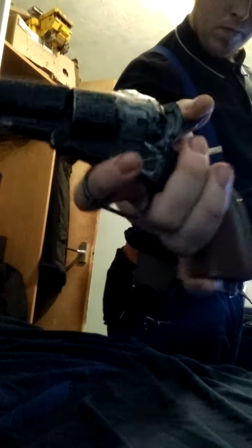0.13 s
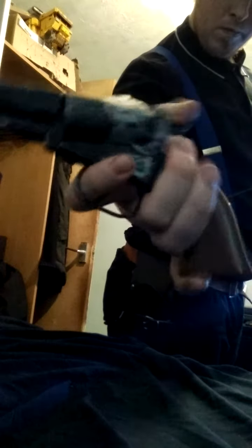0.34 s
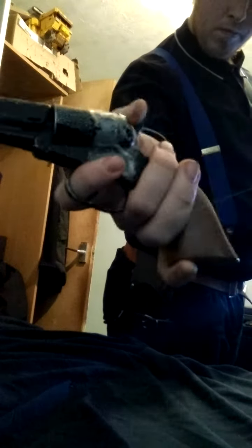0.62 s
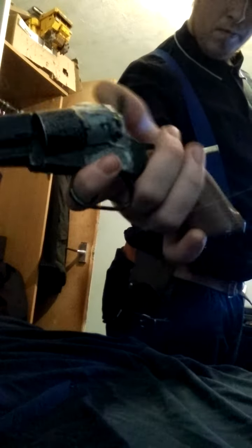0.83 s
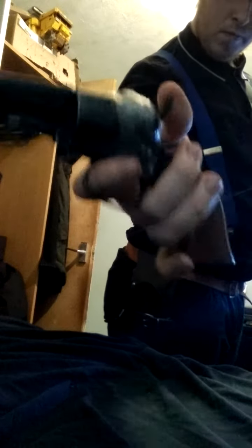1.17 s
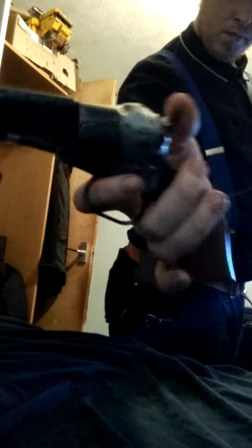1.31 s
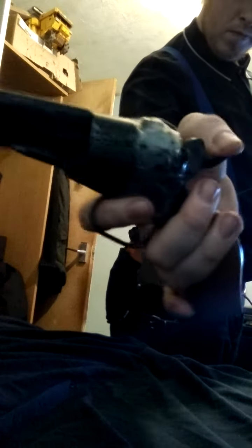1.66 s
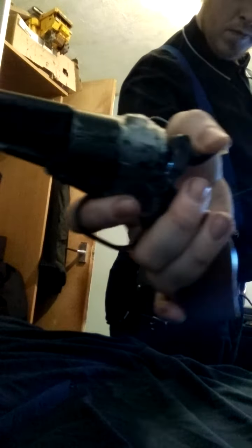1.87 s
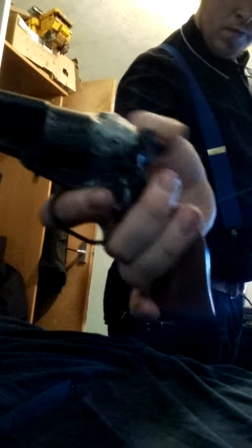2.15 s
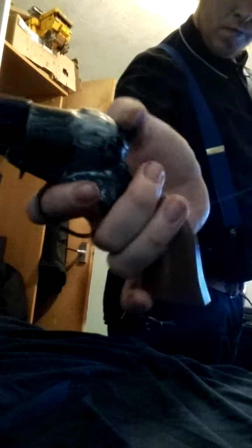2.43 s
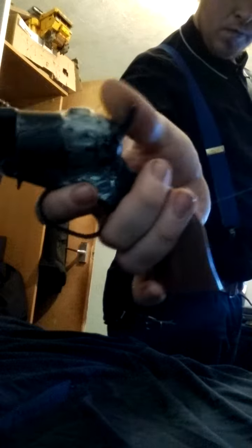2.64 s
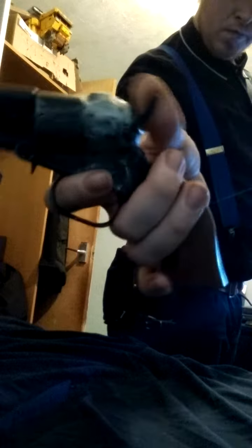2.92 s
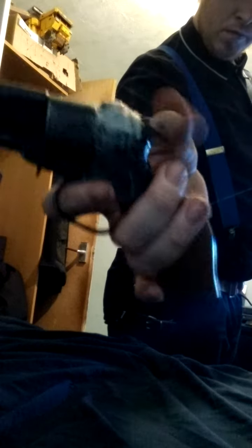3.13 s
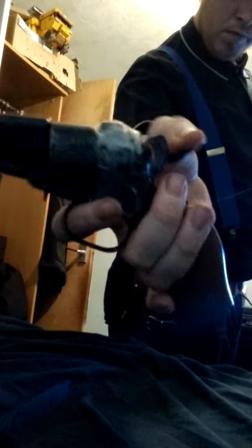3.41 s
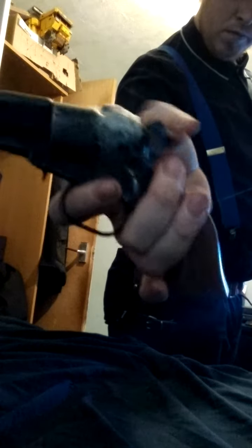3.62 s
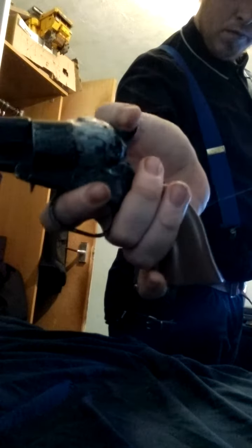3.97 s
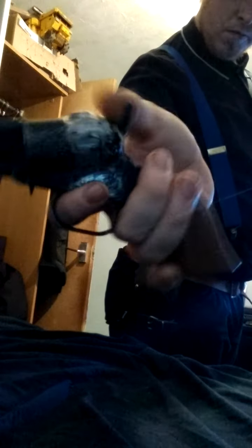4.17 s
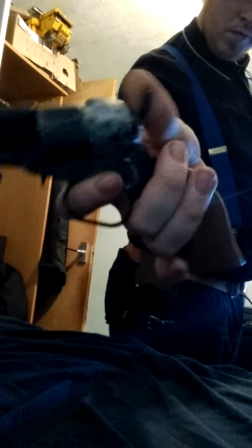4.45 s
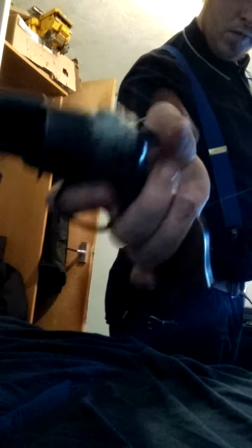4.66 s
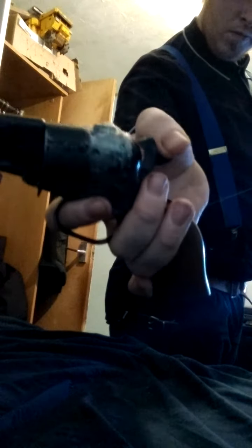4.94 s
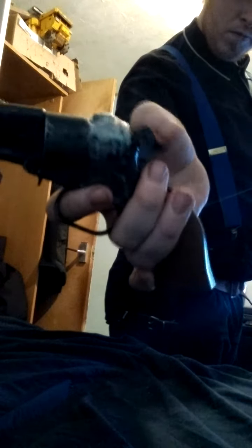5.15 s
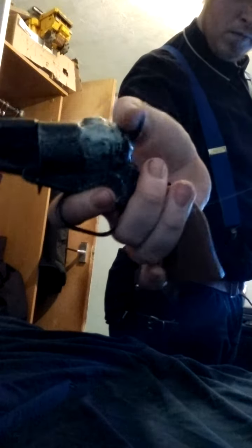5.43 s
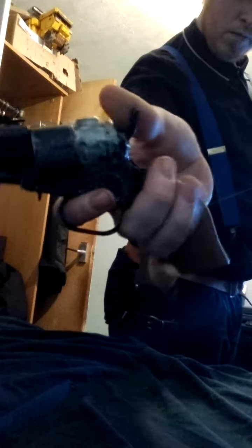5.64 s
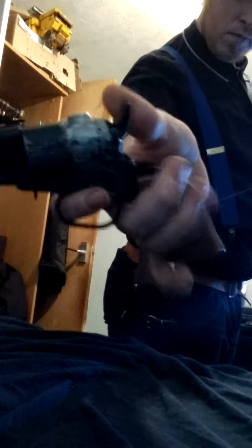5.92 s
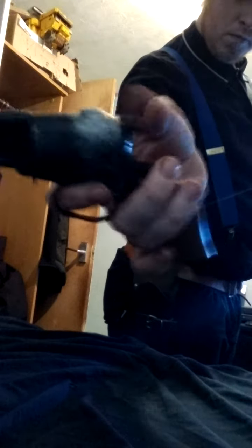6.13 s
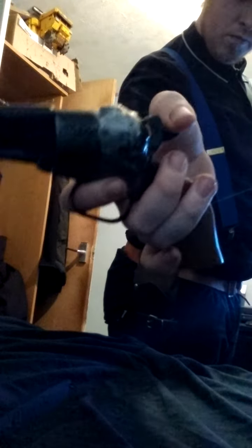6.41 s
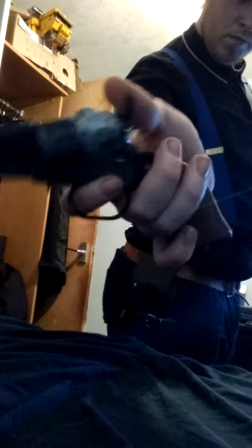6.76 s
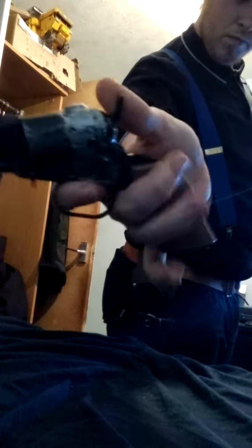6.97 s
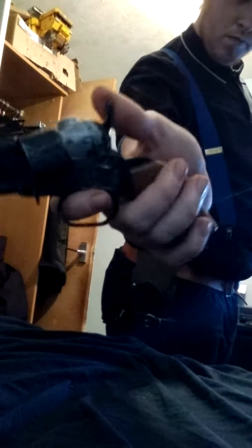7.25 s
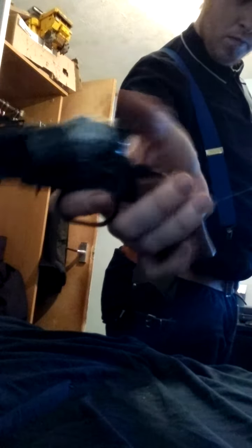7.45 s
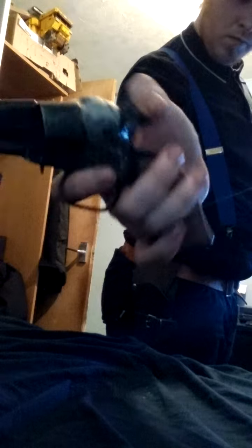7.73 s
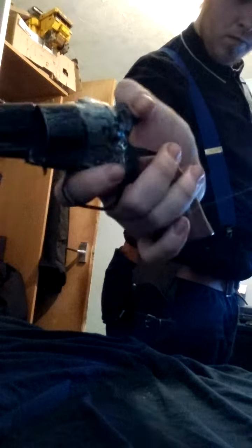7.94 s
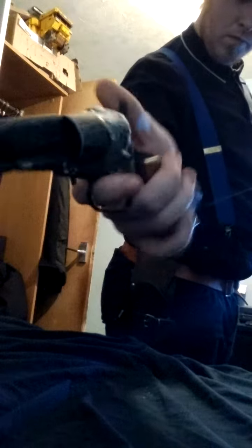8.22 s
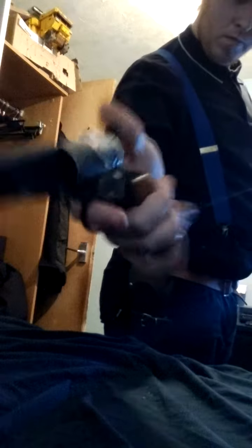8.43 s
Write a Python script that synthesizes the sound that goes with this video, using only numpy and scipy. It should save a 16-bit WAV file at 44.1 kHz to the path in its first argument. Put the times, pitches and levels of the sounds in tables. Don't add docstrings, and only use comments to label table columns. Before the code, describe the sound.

A die-cast toy gun is repeatedly cocked, dry-fired and eased down. Isolated sharp snaps come first, then clusters of ratcheting clicks and brief metal scrapes, ending with a fast run of loud snaps and a few weak ticks. The sound is dry, close and wide in stereo; the soft room noise dips after loud clicks and creeps back, with a low drone swelling faintly behind.

```python
import sys
import numpy as np
from scipy import signal
from scipy.fft import rfft, irfft
from scipy.io import wavfile
from scipy.ndimage import uniform_filter1d

SR = 44100
rng = np.random.default_rng(int(sys.argv[2]) if len(sys.argv) > 2 else 0)


def store_pcm(level_fs):
    pcm = np.round(np.clip(level_fs, -1, 1) * 32767).astype(np.int16)
    wavfile.write(sys.argv[1], SR, np.atleast_2d(pcm).T)


def magnitude_from_level(level_db):
    exponent = np.asarray(level_db, float) / 20
    return 10 ** exponent


N = 378378

# (f/Hz, level/dB, t60/s)
SPRING_PARTS = (10700, 15700), [(11320, 2.5, 0.0034), (12800, -3, 0.00063), (13400, -3.5, 0.0059),
                (14900, 0, .002)]
HAMMER_PARTS = (5620, 9600), [(7260, -6.5, 0.0047), (7580, -7.5, 0.0051), (8590, 2.5, 0.0034),
                (9430, 4, 0.0063), (9880, -1, 0.0068)]
FRAME_PARTS = (2090, 5190), [(3240, -2, .006), (3595, 10, 0.0089), (4350, 16, 0.0014), (4700, -9.5, 0.006),
               (4790, 13.5, 0.01)]
GRIP_PARTS = (490, 4300), [(626, -6, 0.023), (1280, 2, 0.011), (1573, 12.5, 0.01), (1730, -12.5, 0.083),
              (1990, 0, 0.014)]


def at_hz(points, hz, column=1):
    p = np.array(points)
    return np.interp(np.log(np.maximum(hz, 1)), np.log(p[:, 0]), p[:, column])


def rms_one(x):
    return x / np.sqrt(np.mean(x ** 2) + 1e-20)


def ring(x, hz, t60):
    decay = magnitude_from_level(-60 / (max(t60, .001) * SR))
    w = 2 * np.pi * hz / SR
    return signal.lfilter([0, np.sin(w)], [1, -2 * decay * np.cos(w), decay * decay], x)


def band_pass(x, band):
    return signal.sosfilt(signal.butter(2, band, "band", fs=SR, output="sos"), x)


def coloured(x, points):
    return irfft(rfft(x) * magnitude_from_level(at_hz(points, np.fft.rfftfreq(N, 1 / SR))), N)


def gain_db():
    # t/s, depth/dB
    ducks = [(.555, 10), (.79, 8.5), (2.17, 5.5), (2.597, 9.5), (3.232, 9.5), (3.952, 12.5), (4.75, 7),
             (5.328, 9.5), (6.68, 4.5), (6.793, 11), (8.097, 14)]
    recovery_db, recovery_curve = 7, 1.1
    overshoot_db, overshoot_s = 2.5, .06
    t, depth = np.arange(N) / SR, np.zeros(N)
    for s, db in ducks:
        since = np.clip(t - s, 0, None)
        dip = db - recovery_db * since ** recovery_curve
        dip += overshoot_db * np.exp(-since / overshoot_s)
        depth = np.maximum(depth, dip * (t >= s))
    return -uniform_filter1d(depth, size=300)


def background():
    # f/Hz, level/dB per Hz
    room_noise = [(20, 16), (35, 12), (50, 12), (110, 3), (300, 3.5), (700, -6), (1300, -12.5), (2500, -12),
                  (5000, -13), (9000, -13.5), (13000, -14), (15300, -17.5), (15750, -51.5)]
    # f/Hz, width/Hz, near port level/dB, far port level/dB
    hums = [(317.3, 6, -6, -6.5), (1237, 12, -22.5, -25), (7740, 250, -15, -60.5), (11100, 200, -23, -61),
            (15050, 250, -8.5, -63)]
    # t/s, level/dB, half-length/s
    swells = [(0.285, -57, 0.35), (1.196, -63, 0.21), (1.495, -61, 0.072), (1.97, -59, .08),
              (2.528, -60.5, .08), (3.054, -59, 0.051), (3.618, -59.5, .12), (4.582, -61.5, 0.092),
              (5.12, -57.5, 0.15), (5.666, -62, .05), (5.95, -58, .13), (6.44, -56.5, .07),
              (6.645, -57.5, 0.087), (7.05, -57.5, 0.089), (7.398, -56.5, 0.12), (7.807, -55, 0.19),
              (8.377, -63, .1)]
    room_db, drone_db = -63.5, -79
    white = rng.standard_normal((3, 2, N))
    noise = rms_one(coloured(white[0], room_noise)) * magnitude_from_level(8.5)
    for hz, width_hz, near_db, far_db in hums:
        t60 = np.log(1000) / np.pi / width_hz
        hum = ring(ring(white[1], hz, t60), hz, t60)
        noise += magnitude_from_level([[far_db], [near_db]]) * rms_one(hum)
    wander_hz = 3.4 * rms_one(uniform_filter1d(white[2, 0], size=6000))
    drone = np.sin(2 * np.pi * np.cumsum(59 + wander_hz) / SR)
    drone = drone * magnitude_from_level([[-3.0], [3.0]])
    t = np.arange(N) / SR
    swell = magnitude_from_level(drone_db) + sum(magnitude_from_level(db) * np.exp(-((t - s) / half) ** 2) for s, db, half in swells)
    return (noise * magnitude_from_level(room_db) + drone * swell) * magnitude_from_level(gain_db())


def room(x):
    # delay t/s, level/dB
    echoes = [(.0073, -8.5), (0.011, -22.5), (0.0186, -21.5)]
    # f/Hz, level/dB, t60/s
    decay = [(300, -9, 0.29), (1000, -3, 0.18), (1650, -6, 0.26), (2590, -12, 0.11), (5160, -1.5, 0.16),
             (8000, 1, 0.13), (11900, -3, 0.15), (15000, -18, .1)]
    t = np.arange(SR // 2) / SR
    edges = 200 * 2 ** np.arange(0, 6.6, .5)
    white, tail = rng.standard_normal((2, len(t))), 0
    for low, high in zip(edges, edges[1:]):
        hz = np.sqrt(low * high)
        t60 = np.clip(at_hz(decay, hz, column=2), .03, 1)
        tail = tail + band_pass(white, [low, high]) * magnitude_from_level(at_hz(decay, hz) - 60 * t / t60)
    tail = magnitude_from_level(-29) * tail * (1 - np.exp(-(t / 0.0013) ** 2))
    for delay, db in echoes:
        late = np.clip(t - delay, 0, None)
        tail += magnitude_from_level(db - 16.0) * white * (t >= delay) * np.exp(-late / 0.00052)
    return signal.fftconvolve(tail, x[None], axes=1)[:, :N]


def slide_db(start, end, first_db, last_db):
    curve, on_db_per_s, off_db_per_s = 2.5, 2502, 1200
    t = np.arange(N) / SR
    travel = np.clip((t - start) / max(end - start, .001), 0, 1)
    edges = on_db_per_s * np.clip(start - t, 0, 1) + off_db_per_s * np.clip(t - end, 0, 1)
    return first_db + (last_db - first_db) * travel ** curve - edges


def scrape():
    # start t/s, end t/s, first level/dB, last level/dB
    slides = [(0.513, 0.567, -59.5, -37.5), (1.587, 1.622, -29, -32.5), (2.346, 2.373, -60, -52),
              (3.173, 3.234, -46, -27.5), (4.743, 4.772, -44, -28), (5.256, 5.331, -57.5, -36.5),
              (6.146, 6.149, -26.5, -38.5), (6.155, 6.208, -54.5, -34.5), (6.721, 6.74, -55, -43.5),
              (6.785, 6.793, -59.5, -22.5), (7.504, 7.574, -46.5, -33.5), (8.074, 8.088, -53, -33),
              (8.112, 8.135, -58.5, -29.5), (8.327, 8.394, -65.5, -56)]
    # f/Hz, level/dB per Hz
    spectrum = [(180, -45), (300, -9), (1420, -12.5), (1700, -4.5), (2400, -6), (3270, -2.5), (4770, -7),
                (10300, -6), (15000, -28)]
    grains_per_s = 3500
    grains = (rng.random(N) < grains_per_s / SR) * magnitude_from_level(1.0 * rng.exponential(1, N))
    grains = grains * rng.choice([-1, 1], N)
    level = sum(magnitude_from_level(slide_db(*row) - 9.0) for row in slides)
    return level * rms_one(coloured(grains, spectrum))


def contact_rows():
    # t/s, spring
    # level/dB, hammer level/dB, frame level/dB, grip level/dB
    snaps = [(.0757, -27.5, -30, -41.5, -67), (0.5527, -12, -9.5, -19.5, -37.5),
             (2.5957, -10, -8, -17, -21.5), (3.2298, -13.5, -15.5, -12.5, -28.5),
             (3.3167, -39.5, -29, -43, -52.5), (3.9473, -9.5, -9, -13, -26.5),
             (5.3273, -9, -11, -15.5, -30.5), (6.6782, -13, -11.5, -14.5, -33.5),
             (6.7419, -24.5, -11.5, -10, -40.5), (6.7908, -10.5, -10, -19.5, -23.5),
             (8.0952, -14.5, -4.5, -10, -21), (8.1308, -16.5, -8, -24.5, -28),
             (.551, -31.5, -15, -26.5, -29.5), (1.622, -28, -27, -46, -55), (1.6259, -34, -34.5, -36, -55),
             (6.195, -31.5, -23.5, -21, -50), (8.0916, -24, -18, -36.5, -53)]
    # t/s, spring level/dB, hammer level/dB, frame level/dB, grip level/dB
    landings = [(.791, -24.5, -14.5, -18, -29), (1.5848, -31.5, -26, -20.5, -27.5),
                (2.1709, -14, -17, -14, -33), (2.3783, -26, -19, -21.5, -30.5),
                (4.2134, -28.5, -18.5, -25, -31), (5.5394, -28, -20.5, -27.5, -33),
                (7.317, -38, -37, -45.5, -73.5)]
    # t/s, hammer level/dB, frame level/dB, grip level/dB
    ratchet = [(1.5436, -38.5, -28, -33.5), (1.5923, -26.5, -26.5, -33), (1.5981, -28, -22, -30.5),
               (1.609, -25.5, -15.5, -25), (.771, -39, -52, -47.5), (3.737, -64, -59, -49),
               (5.978, -62, -51.5, -51), (3.173, -46, -33, -38), (3.176, -34, -31.5, -36.5),
               (3.1807, -31, -35, -44), (3.2046, -31, -30, -37), (3.2169, -38, -31, -43.5),
               (4.7444, -35.5, -30, -38), (4.762, -27.5, -41, -36), (4.765, -33, -27.5, -34),
               (4.7746, -27, -23, -29), (4.7959, -33.5, -34.5, -58), (6.1383, -41.5, -36.5, -30),
               (6.142, -28.5, -28.5, -43), (6.1795, -33.5, -23.5, -35), (6.191, -27, -39, -49),
               (6.1976, -25, -29, -36), (6.2082, -38, -35, -31), (6.2152, -24, -22, -25),
               (7.5025, -34.5, -31.5, -41), (7.5172, -29, -27, -39.5), (7.5442, -33, -30, -40),
               (7.5555, -34, -30.5, -40), (7.567, -43.5, -51, -34), (7.5731, -27.5, -24.5, -33)]
    # t/s, hammer level/dB, frame level/dB, grip level/dB
    take_up = [(.427, -39, -29.5, -40.5), (0.4442, -61.5, -42.5, -47), (.5089, -34.5, -42, -44.5),
               (0.5273, -47.5, -43.5, -38.5), (0.547, -29, -38, -42), (.754, -39, -54, -68),
               (1.546, -42, -43, -45), (1.5579, -44, -45, -49), (2.168, -46.5, -36, -44),
               (2.3659, -47.5, -44.5, -50), (2.5928, -36.5, -38, -45), (3.9405, -41.5, -50, -46.5),
               (4.699, -47.5, -39, -50.5), (4.7567, -34, -38, -46), (5.252, -53.5, -42, -42.5),
               (5.2642, -50, -40, -62), (5.3033, -43.5, -45, -42.5), (5.321, -49, -41, -51),
               (6.7266, -44, -45.5, -38), (6.7357, -44, -50.5, -48), (7.4947, -41, -47, -73),
               (7.498, -50, -31.5, -62), (7.5403, -42, -33, -44), (8.0556, -38, -37.5, -59.5),
               (8.0739, -39, -38, -36.5)]
    # t/s, hammer level/dB, frame level/dB
    ticks = [(1.5629, -43, -47), (2.392, -34, -43), (3.2607, -38, -50.5), (3.3117, -53, -74),
             (3.7553, -53, -45), (5.5572, -37, -44.5), (5.9466, -49.5, -55), (6.0151, -49.5, -64),
             (6.2566, -44, -47), (6.2623, -51, -62), (6.6046, -65.5, -45.5), (6.6467, -59, -42.5),
             (7.6477, -48, -58), (7.717, -65, -43.5), (7.7344, -44.5, -53), (7.8893, -50, -47),
             (7.9391, -50.5, -54), (7.9494, -44, -42.5), (8.0043, -39.5, -39), (8.0126, -51, -51),
             (8.2982, -43, -49.5), (8.3355, -53, -63), (8.3435, -59, -55.5), (8.3862, -65, -57)]
    snap_ms, landing_ms, ratchet_ms, take_up_ms, tick_ms = 1.5, 3.37, 3.16, 3, 2.5
    ratchet_spring_db, take_up_spring_db, tick_spring_db, tick_grip_db = -8.5, -16.5, -9, -12.5
    rows = [(*row, snap_ms) for row in snaps]
    rows += [(*row, landing_ms) for row in landings]
    rows += [(s, h + ratchet_spring_db, h, f, g, ratchet_ms) for s, h, f, g in ratchet]
    rows += [(s, h + take_up_spring_db, h, f, g, take_up_ms) for s, h, f, g in take_up]
    rows += [(s, h + tick_spring_db, h, f, f + tick_grip_db, tick_ms) for s, h, f in ticks]
    return rows


def scattered():
    s, *levels_db, ms = np.transpose(contact_rows())
    groups = SPRING_PARTS, HAMMER_PARTS, FRAME_PARTS, GRIP_PARTS
    out = np.zeros(N)
    for (band, modes), db in zip(groups, levels_db):
        blows = np.full(N, 1e-18)
        blows[np.round(s * SR).astype(int)] = magnitude_from_level(db) * np.sqrt(ms * SR / (band[1] - band[0]))
        out += band_pass(blows, band)
    return out


def struck(chatter, group, level_db, crack_db):
    band, modes = group
    draws = rng.standard_normal((len(chatter), len(modes), 2))
    out = magnitude_from_level(crack_db) * chatter
    for k, row in enumerate(chatter):
        for (hz, db, t60), (u, v) in zip(modes, draws[k]):
            out[k] += magnitude_from_level(db + 3 * u) * ring(row, hz * (1 + .03 * v), t60)
    out = band_pass(out, band)
    peak = np.sqrt(2 * uniform_filter1d(out ** 2, size=36, axis=1).max(axis=1))
    return out * (magnitude_from_level(level_db) / peak)[:, None]


def contacts():
    # (f/Hz, level/dB, t60/s)
    thump = (120, 880), [(162, 0, 0.013), (288, 0.0049, 0.02)]
    first_blow_db = 12.5
    thump_db = -18
    s, spring_db, hammer_db, frame_db, grip_db, ms = np.transpose(contact_rows())
    t = np.arange(1400) / SR
    length = np.clip(ms, .3, 5)[:, None] * .00065
    envelope = np.exp(-(t / length) ** 1.8) * (1 - np.exp(-t / 0.00009))
    chatter = rng.standard_normal((len(s), len(t))) * envelope
    chatter[:, 6] += magnitude_from_level(first_blow_db)
    sound = struck(chatter, SPRING_PARTS, spring_db, crack_db=16.5)
    sound += struck(chatter, HAMMER_PARTS, hammer_db - 0.5, crack_db=7.5)
    sound += struck(chatter, FRAME_PARTS, frame_db + 0.5, crack_db=17.5)
    sound += struck(chatter, GRIP_PARTS, grip_db - 1.0, crack_db=11.0)
    sound += struck(chatter, thump, grip_db + thump_db, crack_db=6.0)
    out = np.zeros(N + len(t))
    for at, row in zip(np.round((s - .0003) * SR).astype(int), sound):
        out[at:at + len(t)] += row
    return out[:N]


def scene():
    # f/Hz, level/dB
    shade = [(500, -2.5), (1500, -11.5), (3000, -5.5), (6000, -15.5), (12000, -5.5)]
    far_lead_s = .0001
    scattered_db, ringing_db = 1.5, -14
    hits, slides = contacts(), scrape()
    gun = hits + slides
    hz = np.fft.rfftfreq(N, 1 / SR)
    path = magnitude_from_level(at_hz(shade, hz)) * np.exp(2j * np.pi * hz * far_lead_s)
    direct = np.array([irfft(rfft(gun) * path, N), gun])
    into_room = magnitude_from_level(scattered_db) * scattered() + magnitude_from_level(ringing_db) * hits + slides
    return direct + room(into_room) + background()


def roll_off(x):
    return signal.sosfilt(signal.butter(12, 16460, fs=SR, output="sos"), x)


def record(dry):
    # f/Hz, level/dB
    far_port = [(1000, 0), (4000, -1.5), (6500, -4.5), (11000, -5.5), (12000, -11), (16000, -13)]
    # f/Hz, level/dB
    crossfeed = [(50, -26), (130, -10), (400, -4), (1000, -1.5), (2400, -1.5), (3300, -6), (4800, -5),
                 (8000, -13), (15000, -22)]
    port_gap_s, cutoff_hz = .00042, 16800
    hz = np.fft.rfftfreq(N, 1 / SR)
    far, near = rfft(dry)
    far = far * magnitude_from_level(at_hz(far_port, hz))
    cross = magnitude_from_level(at_hz(crossfeed, hz)) * np.exp(-2j * np.pi * hz * port_gap_s)
    sides = irfft(np.array([far - cross * near, near - cross * far]), N)
    sides = signal.sosfilt(signal.cheby2(10, 50, cutoff_hz, fs=SR, output="sos"), sides)
    mix = np.clip(sides, -1, 1)
    return roll_off(mix)


dry = scene()
out = record(dry)
store_pcm(out)
```